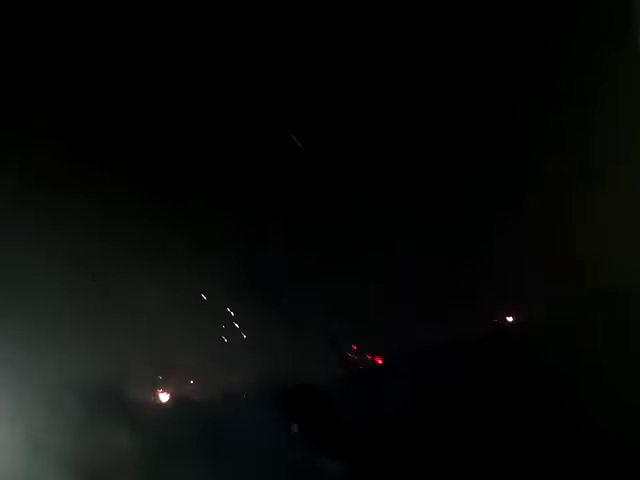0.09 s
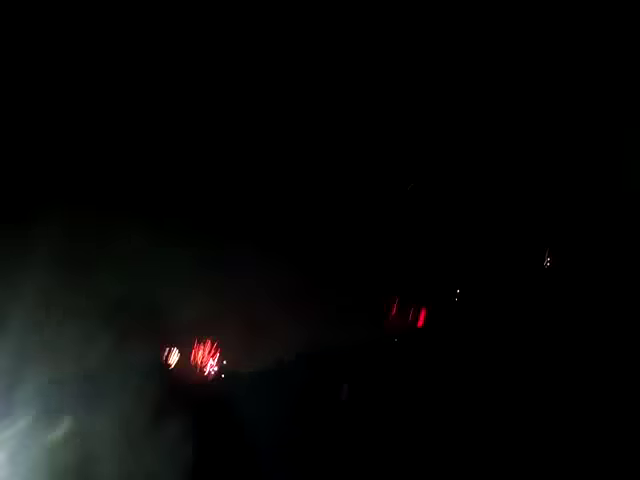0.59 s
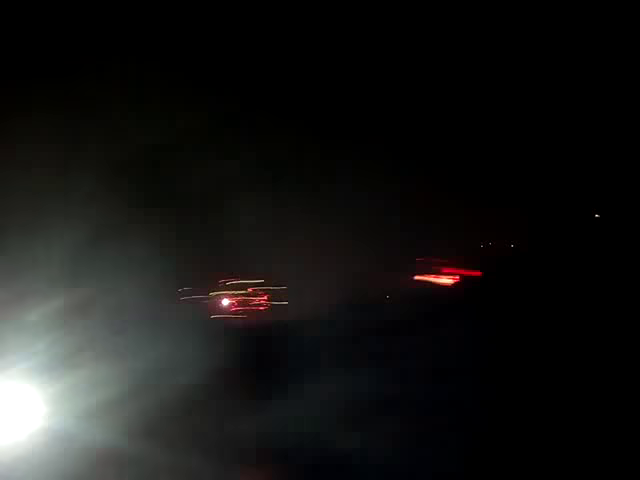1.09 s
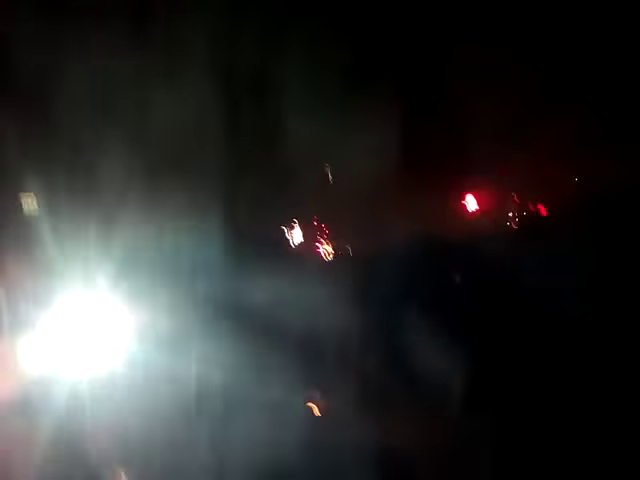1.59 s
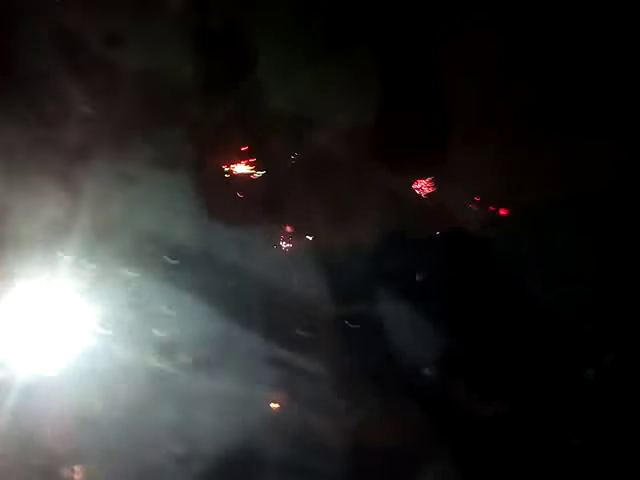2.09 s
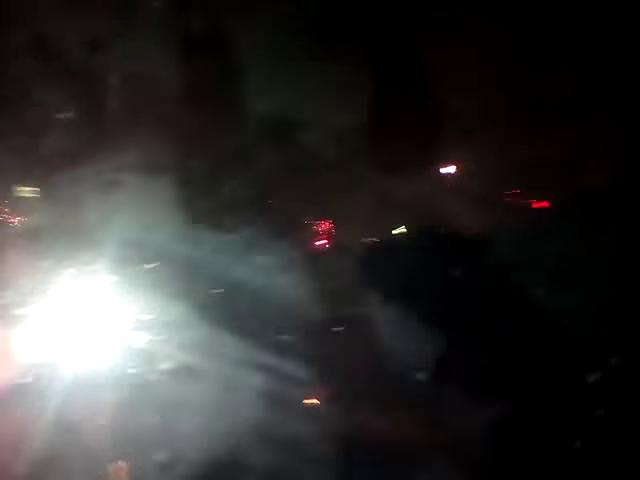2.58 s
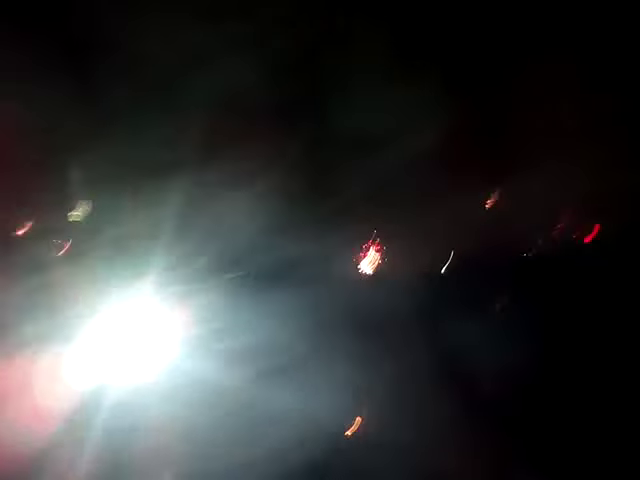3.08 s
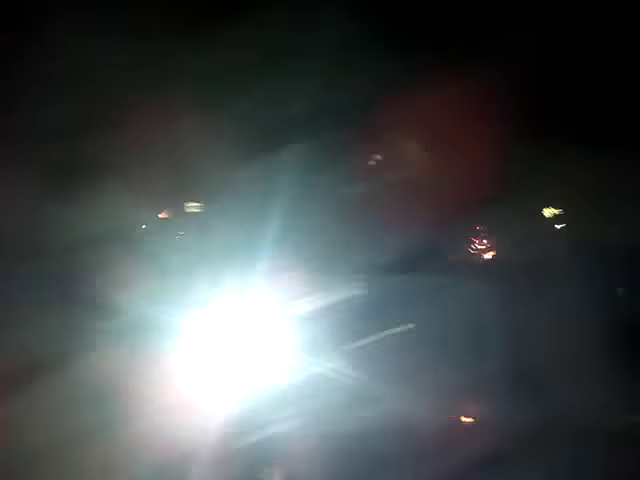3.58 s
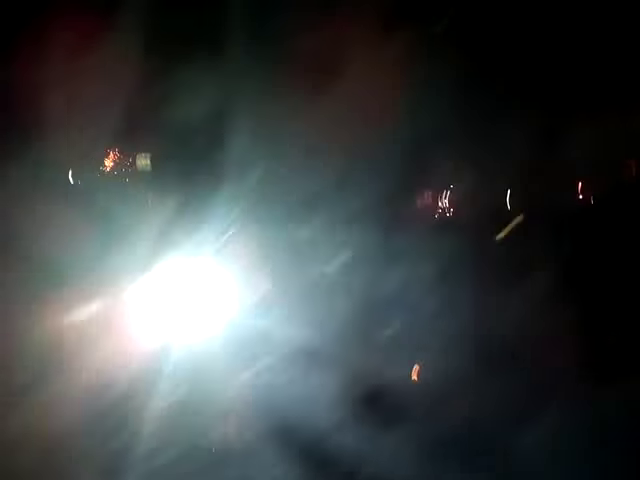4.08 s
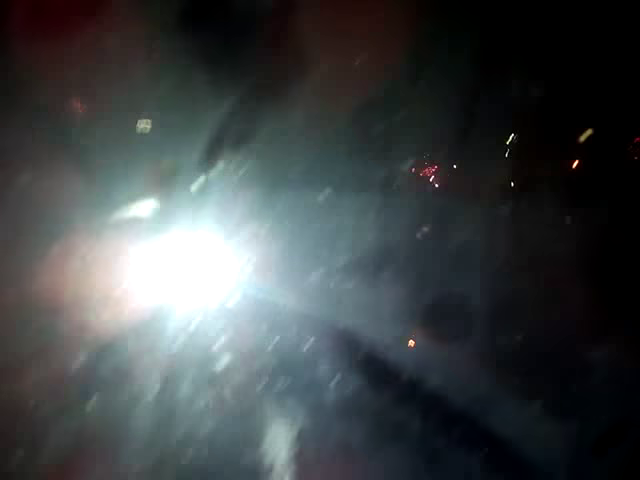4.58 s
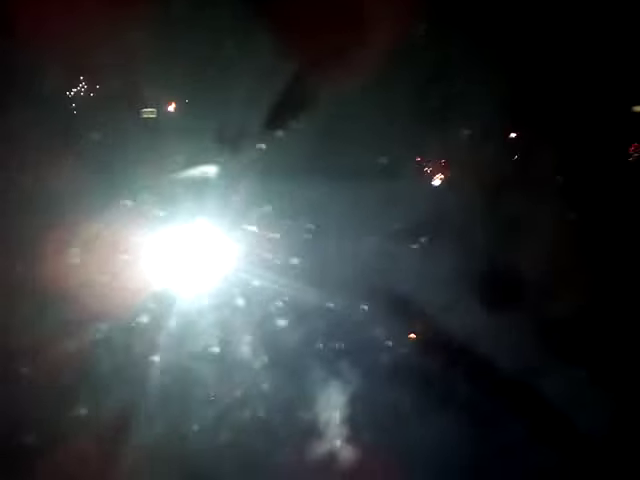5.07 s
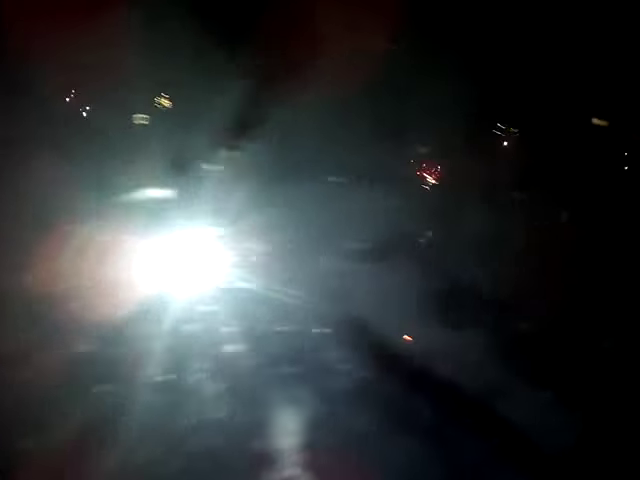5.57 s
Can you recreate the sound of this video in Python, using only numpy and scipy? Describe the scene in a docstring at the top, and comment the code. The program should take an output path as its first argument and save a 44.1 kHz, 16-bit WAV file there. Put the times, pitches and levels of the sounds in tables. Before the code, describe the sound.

Outdoors in a city street at night, firework bangs come densely in the first second, then more sparsely, each with hard reflections and a short street tail. A far barrage rumbles underneath with deep booms. Near 4.5 seconds a spinning firework thumps and hisses with a fast flutter; another starts as the clip ends. Small, nearly mono microphone.

```python
"""Single firework bangs crack over a city at night and echo off house fronts: each a pressure spike,
smeared reflections, a street tail and the ring of a hollow. Twice a spinning firework lifts off with
a thump and hisses: noise coloured by narrow resonances, fluttering about 30 to 50 times a second.
Behind them brief spits of hiss, a rolling far barrage of shaped noise, deep booms and faint narrow
rings, all through a small, nearly mono microphone."""
import sys
import numpy as np
from scipy import signal
from scipy.fft import next_fast_len
from scipy.io import wavfile
from scipy.ndimage import uniform_filter1d

SR = 44100
rng = np.random.default_rng(int(sys.argv[2]) if len(sys.argv) > 2 else 0)


def wav_record(signal):
    """Record a signal, one row per channel, as 16-bit PCM in the file named by sys.argv[1]."""
    frames = np.transpose(np.atleast_2d(signal))
    bounded = np.clip(frames, -1, 1)
    # unit amplitude maps onto the largest positive 16-bit level
    quanta = np.round(bounded * 32767).astype(np.int16)
    wavfile.write(sys.argv[1], SR, quanta)


def convert_level_to_amplitude(level_db):
    """Map a level in decibels to its linear amplitude factor."""
    exponent = np.asarray(level_db, float) / 20
    return 10 ** exponent


N = 249206


def evened(x):
    """Scales to an rms of 1."""
    return x / np.sqrt(np.mean(x ** 2) + 1e-20)


def read(points, hz):
    """Reads a table on a log-frequency axis."""
    f, value = np.transpose(points)
    return np.interp(np.log(hz + 1), np.log(f + 1), value)


def above(hz, edge_hz):
    """A soft step from 0 to 1 around an edge."""
    return 1 / (1 + (edge_hz / (hz + 1)) ** 6)


def peak(hz, centre_hz, width_hz):
    """Power response of a resonance, 1 at its centre."""
    return 1 / (1 + (2 * (hz - centre_hz) / width_hz) ** 2)


def coloured(x, db):
    """Causal filter whose gain in dB is a function of frequency."""
    gain_db = np.maximum(db(abs(np.fft.fftfreq(4096, 1 / SR))), -100)
    log_gain = np.log(convert_level_to_amplitude(gain_db))
    taps = np.fft.ifft(np.exp(np.conj(signal.hilbert(log_gain)))).real
    return signal.fftconvolve(x, taps[:2048])[:len(x)]


def hiss(db, size=512, patchy_db=2.0):
    """Random short-time spectra; db(hz, t) gives the level field, patches roughen it."""
    hop = size // 4
    frames = N // hop + 5
    hz, t = np.fft.rfftfreq(size, 1 / SR)[:, None], np.arange(frames) * hop / SR
    a, b, patch = rng.standard_normal((frames, len(hz), 3)).T
    patch = evened(uniform_filter1d(uniform_filter1d(patch, size=9, axis=0), size=12, axis=1))
    z = (a + 1j * b) * convert_level_to_amplitude(db(hz, t) + patchy_db * patch)
    return signal.istft(z, nperseg=size, noverlap=size - hop)[1][:N]


def burst(start_s, rise_s, hold_s, db, fall_db_per_s):
    """Gain that swells up, holds and then dies away."""
    t = np.arange(N) / SR - start_s
    falling_s = np.maximum(t - rise_s - hold_s, 0)
    return np.clip(t / rise_s, 0, 1) ** 2 * convert_level_to_amplitude(db - fall_db_per_s * falling_s)


# narrow resonances of the listening place: (frequency [Hz], width [Hz])
NOOK = [(545, 228), (780, 27), (1010, 55), (1135, 60), (1390, 220), (1550, 18), (1715, 36), (2240, 9.4),
        (2500, 35), (2740, 77), (3070, 71), (3345, 100), (4350, 17), (4700, 7.1), (5290, 13)]


def nook(f):
    """Lift in dB from the narrow resonances around the microphone."""
    return 10 * np.log10(1 + 2.08 * sum(peak(f, hz, width_hz) for hz, width_hz in NOOK))


# reflections off house fronts: (delay [s], level [dB])
FRONTS = [(.007, -6), (0.0103, -10.5), (0.013, -5.5), (0.014, -7.5), (0.023, -6.5), (0.033, -13.5),
          (.062, -15.5), (0.084, -14.5), (0.111, -18.5), (0.147, -20.5)]


def shock(t, blunt):
    """A dull forerunner, a sharp crack leading the push of the spike, then its reflections."""
    short = SR // 16
    early = t[:short]

    def bump(at_s, width_s):
        return np.exp(-((early - at_s) / width_s) ** 2) / (width_s * SR * np.sqrt(np.pi))

    out = np.zeros(len(t))
    out[:short] = convert_level_to_amplitude(-7) * bump(0.0008, 0.0003)
    out[:short] += convert_level_to_amplitude(-1.5) * bump(0.00425, 0.00003 * blunt)
    out[:short] -= bump(0.0052, 0.00007 * blunt)
    for delay_s, db in FRONTS:
        # later reflections come smeared off rough fronts
        smear = rng.standard_normal(short) * np.exp(-early / (0.002 * blunt + 0.09 * delay_s))
        out[round(delay_s * SR):][:short] += convert_level_to_amplitude(db) * smear / np.linalg.norm(smear)
    return out


# street reverberation: (frequency [Hz], t60 [s])
STREET = [(60, 1), (250, 1), (600, 0.61), (1500, 0.43), (3500, 0.49), (6000, 0.15)]
TAIL_PATCHY_DB, SLAP_DB = 2.6, 1.8  # uneven echoes; slaps across the whole spectrum


def street_tail(t):
    """Decaying noise: near walls die fast, far blocks slowly."""
    noise = rng.standard_normal(len(t)) * (1 - np.exp(-(t / 0.0065) ** 4))
    hz, frame_s, z = signal.stft(noise, SR, nperseg=256)
    patch = rng.standard_normal(z.shape)
    patch = evened(uniform_filter1d(uniform_filter1d(patch, size=2, axis=0), size=24, axis=1))
    slaps = evened(uniform_filter1d(rng.standard_normal(len(frame_s)), size=3))
    t60_s = read(STREET, hz)[:, None]
    fall = convert_level_to_amplitude(-60 * frame_s / t60_s) + convert_level_to_amplitude(-8.5 - 60 * frame_s / (0.45 * t60_s))
    uneven = convert_level_to_amplitude(TAIL_PATCHY_DB * patch + SLAP_DB * slaps)
    tail = signal.istft(z * fall * uneven, SR, nperseg=256)[1][:len(t)]
    return tail / np.linalg.norm(tail)


# modes of the hollow: (frequency [Hz], level [dB], t60 [s])
HOLLOW = [(263.8, -9.5, 0.37), (554, -16, 0.013), (720, 8, 0.012)]


def hollow_ring(t):
    """Damped sines of the hollow nearby, with a soft onset."""
    ring = np.zeros(len(t))
    for hz, db, t60_s in HOLLOW:
        ring += convert_level_to_amplitude(db) * convert_level_to_amplitude(-60 * t / t60_s) * np.sin(2 * np.pi * hz * t)
    return ring * (1 - np.exp(-(t / 0.011) ** 2))


# spectrum of a bang: (frequency [Hz], level per Hz [dB])
BLAST = [(35, -36.5), (50, -14), (70, -4.5), (357, -6), (561, -13.5), (880, -13), (1230, -16), (1750, -21),
         (2130, -28), (2740, -20.5), (2970, -27), (3610, -25.5), (4750, -35.5), (5340, -33.5),
         (6500, -54.5), (8450, -93.5), (14300, -120)]
KNOCK_HZ, KNOCK_WIDTH_HZ, KNOCK_DB = 550, 180, 5.5  # the spike sets off a few hard cycles
NEAR_DB, NEAR_TAIL_DB, TAIL_PER_DB = -7, -3.5, 0.0407  # fainter is farther: larger share of tail


def bang(level_db, bass_db, treble_db, ring_db):
    """Shock and street tail through the blast spectrum, plus the ring of the hollow."""
    t = np.arange(SR * 3 // 4) / SR
    farther_db = NEAR_DB - level_db
    blunt = np.clip(convert_level_to_amplitude(0.6 * farther_db), 1, 5)  # far bangs arrive rounded
    tail_gain = convert_level_to_amplitude(NEAR_TAIL_DB + TAIL_PER_DB * farther_db)

    def colour(f):
        tilt_db = bass_db * (1 - above(f, 302.0)) + treble_db * above(f, 905)
        return read(BLAST, f) + tilt_db + 1.16 * nook(f) + KNOCK_DB * peak(f, KNOCK_HZ, KNOCK_WIDTH_HZ)

    voice = coloured(signal.unit_impulse(2048), colour)
    drive = shock(t, blunt) + tail_gain * street_tail(t)
    sound = signal.fftconvolve(drive, voice / abs(voice).max())[:len(t)]
    return convert_level_to_amplitude(level_db) * (sound + convert_level_to_amplitude(ring_db) * hollow_ring(t))


# (time [s], level [dB], added bass [dB], added treble [dB], hollow ring re bang [dB])
BANGS = [(0.036, -26, 8.5, -5, -27), (0.084, -29, -4.5, -13, 6), (0.262, -37.5, -5.5, -18.5, -24),
         (0.35, -40, 5, -9, 2), (0.44, -21.5, 7.5, -20, -2.5), (0.509, -33.5, 2.5, -4.5, -14.5),
         (0.621, -31, 11.5, -10.5, -15), (0.752, -29, 6.5, -27, -19), (0.853, -33, 7, -20, 8),
         (0.954, -15.5, 1, -5.5, -13), (1.029, -33, 8, 4, -14), (1.088, -31.5, 1.5, -7, -26),
         (1.68, -26.5, 2.5, -14, -13), (1.991, -33, 9, -47, -22), (2.021, -56, 9, -13, -15),
         (2.047, -41.5, -4, -21, -17), (2.599, -24, -5, -6, -14), (2.719, -36, 7, -9, -9),
         (3.030, -33.5, 9.5, -30, 4), (3.066, -34.5, 7, -16, 11), (3.114, -51, 8, -15.5, -1),
         (3.252, -37, 2, -22, 4.5), (3.287, -41, -3, -17, -6), (3.521, -14.5, -6.5, -6, -11),
         (3.929, -35, -10.5, -13, -5), (4.0931, -23.5, 12, 0.5, -41), (4.458, -40, -13, -24, -19),
         (4.486, -22, 11, -4.5, 6.5), (4.547, -34.5, -24, -33, -26), (4.631, -32.5, -4, -5, 5),
         (4.825, -34.5, -14.5, -23, 2), (4.907, -33.5, 17, 10, 7), (5.286, -25, 6.5, -16.5, 4)]


def bangs():
    """Single bangs, each with its own strength, tilt and ring."""
    out = np.zeros(N)
    for start_s, *row in BANGS:
        sound = bang(*row)
        part = out[round(start_s * SR):][:len(sound)]
        part += sound[:len(part)]
    return out


# spinning fireworks: (start [s], burn [s], hiss level at start [dB], growth [dB/s], fall [dB/s])
WHIRLS = [(4.488, 0.43, -56.5, 11, 237), (5.328, 0.12, -57.5, 41, 22)]
# flutter of each: (time [s], rate [beats/s])
FLUTTERS = [
    [(4.497, 29.5), (4.6, 29.5), (4.645, 40), (4.765, 40.8), (4.8, 44), (4.85, 44), (4.9, 52), (4.91, 50)],
    [(5.339, 33), (5.385, 40), (5.45, 41), (5.5, 46), (5.55, 42), (5.65, 38)],
]
# hiss below its top: (frequency [Hz], level per Hz [dB])
HISS_COLOUR = [(590, -53), (1000, -5.5), (1320, -3), (1590, -6), (2060, -1.5), (2870, -6), (3270, -1),
               (3690, -0.5), (4830, -0.5), (5950, 1.5), (8000, -22.5), (10400, -53), (17600, -120)]
# narrow resonances heard in the hiss: (frequency [Hz], width [Hz], strength [dB])
HISS_PEAKS = [(1935, 37, 10.5), (2155, 27, 9), (3283, 97, 5), (4760, 32, 8.5), (5940, 67, -10)]
# top of the hiss: (frequency [Hz], level per Hz [dB])
SPRAY = [(3820, -20), (6500, 8), (7910, -5.5), (8320, -13), (8630, -6.5), (9220, -16), (10400, -7.5),
         (12500, -19.5), (13800, -30), (15500, -29)]
# flares of the top: (time [s], level re hiss [dB])
FLARES = [(4.532, -22), (4.681, -16.5), (4.765, -24), (4.94, -16.5), (5.36, -19), (5.449, -15.5),
          (5.549, -18)]
LIGHT_S, SPRAY_DB, FLARE_S = 0.023, -16, 0.039
BEAT_DB, BLUR_DB = 14, 0.42  # flutter depth at 28 beats/s; loss per beat/s more
SPARKS_PER_S, SPARKS_DB = 1800, -7  # burning grains snap in the hiss


def whirl():
    """A hiss coloured by narrow resonances; each beat of its flutter sets in sharply and fades."""
    def colour(f):
        peaks = sum(convert_level_to_amplitude(db) ** 2 * peak(f, hz, width_hz) for hz, width_hz, db in HISS_PEAKS)
        return read(HISS_COLOUR, f) + 10 * np.log10(1 + 2.0 * peaks)

    def below_db(f, edge_hz):
        return 20 * np.log10(1 - above(f, edge_hz))

    body = evened(hiss(lambda f, t: colour(f) + below_db(f, 7500), size=1024, patchy_db=1.3))
    top = evened(hiss(lambda f, t: read(SPRAY, f) + 20 * np.log10(above(f, 7500)), patchy_db=4))
    sparks = rng.standard_normal(N) * convert_level_to_amplitude(3 * rng.exponential(1, N).clip(0, 4))
    sparks *= rng.random(N) < SPARKS_PER_S / SR
    body = body + convert_level_to_amplitude(SPARKS_DB) * evened(coloured(sparks, lambda f: colour(f) + below_db(f, 7000)))
    out, t = np.zeros(N), np.arange(N) / SR
    spray = convert_level_to_amplitude(SPRAY_DB) + sum(convert_level_to_amplitude(db) * np.exp(-((t - s) / FLARE_S) ** 2) for s, db in FLARES)
    for (start_s, burn_s, db, growth_db, fall_db), flutter in zip(WHIRLS, FLUTTERS):
        rate = np.interp(t, *np.transpose(flutter))
        beats = np.cumsum(rate * (t >= flutter[0][0])) / SR
        uneven_db = 1.3 * rng.standard_normal(64)[beats.astype(int)]  # each beat differs
        depth_db = np.maximum(BEAT_DB - BLUR_DB * (rate - 28), 0)
        beat_gain = uniform_filter1d(convert_level_to_amplitude(depth_db * (0.5 - beats % 1) + uneven_db), size=100)
        level = burst(start_s, LIGHT_S, burn_s, db, fall_db)
        level = level * convert_level_to_amplitude(growth_db * np.clip(t - start_s, 0, burn_s))
        out += level * beat_gain * (body + spray * top)
    return out


# a sizzle, a fizz, a far chirp: (start [s], rise [s], hold [s], level [dB], fall [dB/s])
SPITS = [(2.608, 0.024, 0.061, -74.5, 318), (2.787, 0.034, .003, -59, 268), (4.302, 0.018, 0.043, -64, 212)]
# their spectra: (frequency [Hz], level per Hz [dB])
SIZZLE_COLOUR = [(2940, -37.5), (5000, -6), (5520, 1.5), (7340, -13), (9020, -23), (9750, -10),
                 (14000, -28.5)]
FIZZ_COLOUR = [(880, -41), (1500, -21), (1690, 2.5), (2640, -33), (3410, 0), (4530, -5.5), (5900, 5),
               (7030, -11), (10300, -17), (12300, -3), (15500, -13)]
CHIRP_COLOUR = [(880, -56), (1500, 4), (1580, -45), (1880, 6.5), (2140, 2), (2460, -11), (4230, -4),
                (7000, -24), (9100, -60), (15400, -120)]


def fizzes():
    """Short bright spits of shaped noise."""
    out = np.zeros(N)
    for row, colour in zip(SPITS, (SIZZLE_COLOUR, FIZZ_COLOUR, CHIRP_COLOUR)):
        out += burst(*row) * evened(hiss(lambda f, t: read(colour, f), patchy_db=2.6))
    return out


# how busy the far barrage is: (time [s], level [dB])
BARRAGE = [(0.0, -41.5), (0.3, -51), (0.49, -49.5), (0.74, -41), (1.05, -48.5), (1.34, -42.5), (1.5, -47.5),
           (1.84, -51.5), (2.11, -49), (2.42, -53.5), (2.74, -45.5), (2.83, -46), (3.19, -53),
           (3.34, -54.5), (3.57, -52.5), (3.76, -43), (4.1, -46.5), (4.23, -44.5), (4.42, -50.5),
           (4.58, -45.5), (5.05, -47), (5.43, -54.5), (5.65, -47.5)]
# its spectrum: (frequency [Hz], level per Hz [dB])
ROLL = [(15, -5), (27, 6.5), (45, -21), (87, -2.5), (103, -3.5), (204, -11.5), (260, -7.5), (332, -20.5),
        (366, -13), (818, -31), (880, -32.5), (1580, -45), (1780, -41.5), (5220, -49), (8500, -75),
        (11000, -99), (18700, -120)]
# far crackling that comes and goes: (start [s], rise [s], hold [s], level [dB], fall [dB/s])
CRACKLE = [(-0.05, 0.029, 0.28, -58.5, 189), (0.495, 0.075, 0.25, -65.5, 115),
           (2.609, 0.23, 0.039, -66, 81), (3.395, 0.16, 0.062, -66, 25)]
# unevenness: (bass [dB], middle [dB], treble [dB])
PATCHY_DB = (2.5, 2.5, 3.5)
FAR_PER_S, FAR_SHARE = 110, 0.11  # thud rate; share of power that follows the thuds
# levels when as busy as usual, and dB per dB of change
USUAL_DB, BASS_DB, BASS_FOLLOWS, TREBLE_DB, TREBLE_FOLLOWS = -49, -52, 0.39, -72.5, 0.27


def barrage():
    """Countless far bangs merge into a roll; some still stand out as dull thuds."""
    t = np.arange(N) / SR
    busy_db = np.interp(t, *np.transpose(BARRAGE))
    thuds = convert_level_to_amplitude(7.6 * np.minimum(rng.exponential(1, N), 4)) * (rng.random(N) < FAR_PER_S / SR)
    power = abs(signal.fftconvolve(thuds ** 2, np.exp(-t[:4000] / 0.024))[:N])
    swell = np.sqrt(1 - FAR_SHARE + FAR_SHARE * power / power.mean())
    swell = uniform_filter1d(swell, size=100)
    bass = convert_level_to_amplitude(BASS_DB + BASS_FOLLOWS * (busy_db - USUAL_DB))
    treble = convert_level_to_amplitude(TREBLE_DB + TREBLE_FOLLOWS * (busy_db - USUAL_DB))
    treble = np.sqrt(treble ** 2 + sum(burst(*row) ** 2 for row in CRACKLE))
    gains, lows_hz, highs_hz = (bass, convert_level_to_amplitude(busy_db), treble), (10, 200, 1000), (200, 1000, 20000)
    out = np.zeros(N)
    for gain, lo_hz, hi_hz, patchy_db in zip(gains, lows_hz, highs_hz, PATCHY_DB):
        def band(f, t):
            share_db = 10 * np.log10(above(f, lo_hz) * (1 - above(f, hi_hz)) + 1e-9)
            return read(ROLL, f) + share_db + 0.83 * nook(f)
        out += gain * evened(hiss(band, size=2048, patchy_db=patchy_db))
    return out * swell


# large far shells: (start [s], rise [s], hold [s], level [dB], fall [dB/s])
BOOMS = [(0.393, 0.13, 0.1, -49, 67), (0.661, 0.017, 0.031, -32, 205), (0.703, 0.011, 0.05, -27.5, 484),
         (0.781, .012, 0.025, -32.5, 402), (0.833, 0.037, 0.032, -38, 304),
         (0.897, 0.0069, 0.062, -40, 142), (1.046, 0.016, 0.13, -42.5, 26),
         (1.656, 0.037, 0.036, -42.5, 89), (2.751, 0.095, 0.013, -68, 62),
         (4.442, 0.075, 0.0088, -58.5, 130)]
BOOM_HZ, BOOM_WIDTH_HZ = 97.5, 90


def booms():
    """Large far shells roll in as deep surges of wavering pitch."""
    deep = hiss(lambda f, t: 20 * np.log10(peak(f, BOOM_HZ, BOOM_WIDTH_HZ)) + 0 * t, size=2048)
    swing = abs(signal.hilbert(deep, next_fast_len(N))[:N])
    surge = evened(deep / (swing + 0.3 * swing.mean()))  # level steadied, pitch still wavers
    return surge * np.sqrt(sum(burst(*row) ** 2 for row in BOOMS))


# brief narrow rings: (time [s], frequency [Hz], width [Hz], level [dB], length [s])
RINGS = [(0.46, 2760, 251, -61, 0.027), (0.519, 3200, 450, -54, 0.022), (0.607, 2860, 155.4, -64, 0.075),
         (0.76, 1630, 198, -60.5, 0.074), (0.766, 2770, 145, -64, 0.081), (1.34, 3060, 250, -71.5, 0.19),
         (1.423, 1490, 220, -60, 0.11), (1.772, 3440, 246, -63.5, 0.047), (1.841, 2670, 122, -67, 0.054),
         (2.466, 1600, 260, -71, 0.14), (3.092, 3020, 705, -72, 0.052), (3.072, 1010, 173.5, -53.5, 0.023),
         (3.279, 1300, 200, -59, 0.024), (3.59, 4300, 352, -66, 0.028), (3.61, 2240, 250, -51, 0.025),
         (3.636, 2770, 151.5, -67, 0.05), (3.654, 3500, 500, -65, 0.04), (1.037, 4376, 250, -56, 0.021),
         (1.098, 3260, 500, -52.5, 0.027), (4.17, 3700, 705, -60, 0.046), (4.036, 4280, 299, -71, 0.047),
         (0.197, 2170, 300, -58, 0.05)]


def rings():
    """Faint short patches of narrow noise that come and go."""
    def field_db(f, t):
        power = 0
        for at_s, hz, width_hz, db, length_s in RINGS:
            band = np.exp(-(2 * (f - hz) / width_hz) ** 2)
            power = power + convert_level_to_amplitude(db) ** 2 / width_hz * band * np.exp(-(2 * (t - at_s) / length_s) ** 2)
        return 10 * np.log10(SR / 1024 / 3 * power + 1e-16)

    return hiss(field_db, size=1024, patchy_db=1)


def scene():
    """All sources meet at one microphone."""
    return np.tile(bangs() + whirl() + fizzes() + barrage() + booms() + rings(), (2, 1))


# circuit hiss: (frequency [Hz], level per Hz [dB])
SELF_NOISE = [(3530, -6.5), (6000, 8.5), (6500, 2.5), (10100, -6.5), (12900, -4), (14600, -18),
              (15500, -10)]
SELF_DB = -83


def circuit_hiss():
    """Steady noise of the microphone circuit."""
    return convert_level_to_amplitude(SELF_DB) * evened(hiss(lambda f, t: read(SELF_NOISE, f), patchy_db=0.3))


# unlike part of the channels: (frequency [Hz], side re mid [dB])
APART = [(30, -27.5), (70, -36), (180, -38), (550, -31), (1650, -19.5), (4970, -13.5), (15000, -4)]


def unlike_part(mid):
    """The mid signal with scrambled phases, scaled by frequency."""
    hz, _, z = signal.stft(mid, SR, nperseg=1024)
    scramble = np.exp(2j * np.pi * rng.random(z.shape[::-1]).T)
    return signal.istft(z * scramble * convert_level_to_amplitude(read(APART, hz))[:, None], SR, nperseg=1024)[1][:N]


def top_cut(x):
    """Nothing passes above the cut-off."""
    return signal.sosfilt(signal.butter(12, 15670, fs=SR, output="sos"), x)


def record(dry):
    """The microphone loses most of the deepest bass, adds hiss and a faint unlike part."""
    highpass = signal.butter(6, 60, "high", fs=SR, output="sos")
    mid = signal.sosfilt(highpass, dry[0]) + convert_level_to_amplitude(-19.0) * dry[0]
    mid = mid + circuit_hiss()
    side = unlike_part(mid)
    return top_cut(np.array([mid + side, mid - side]))


dry = scene()
out = record(dry)
wav_record(out)
```